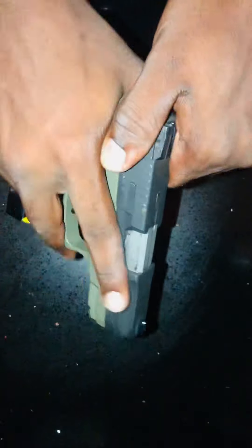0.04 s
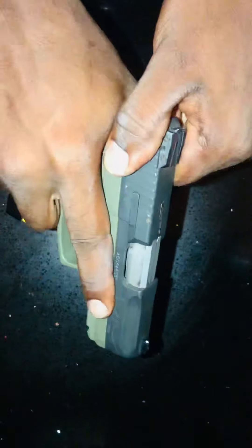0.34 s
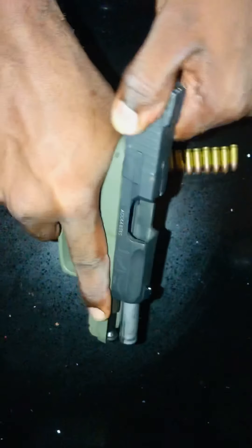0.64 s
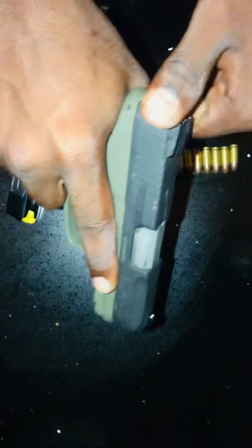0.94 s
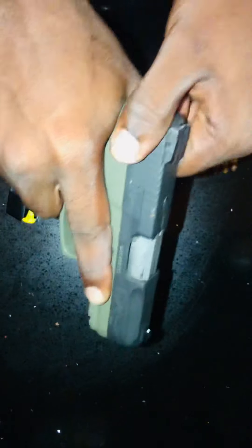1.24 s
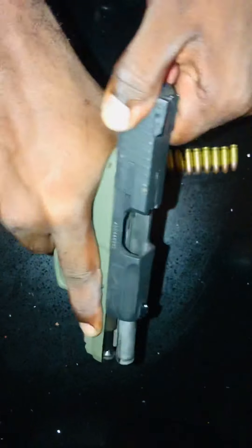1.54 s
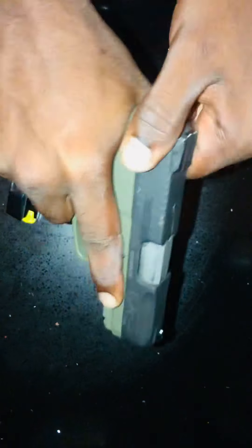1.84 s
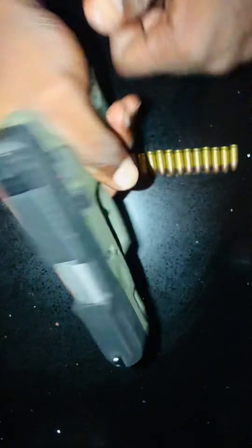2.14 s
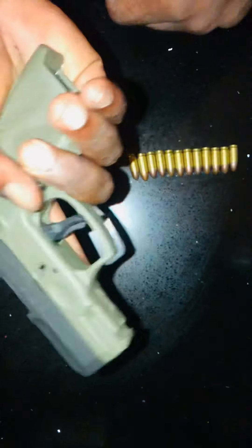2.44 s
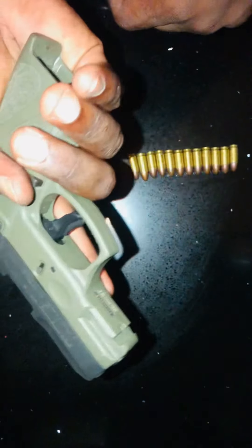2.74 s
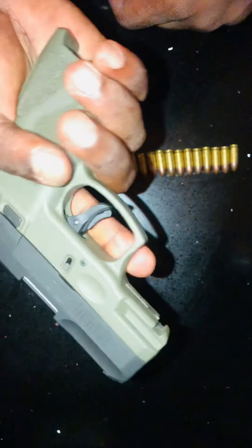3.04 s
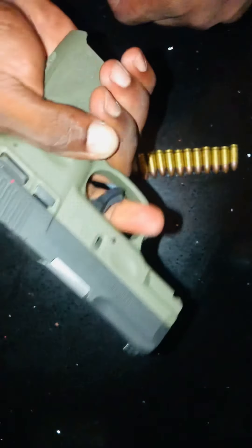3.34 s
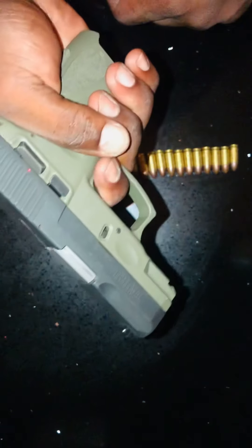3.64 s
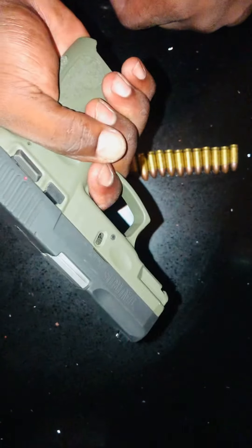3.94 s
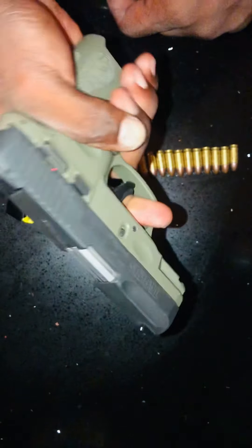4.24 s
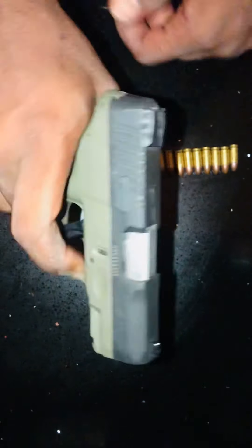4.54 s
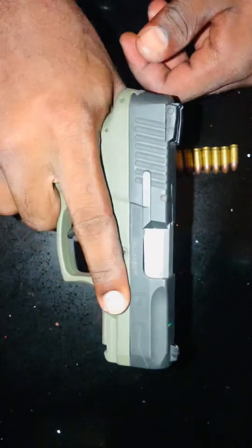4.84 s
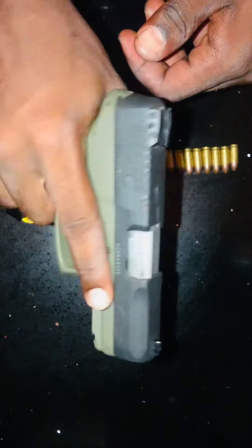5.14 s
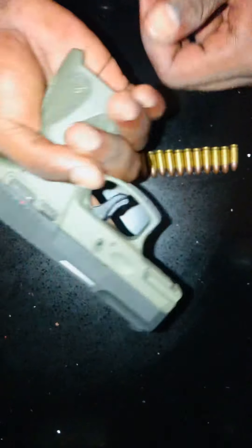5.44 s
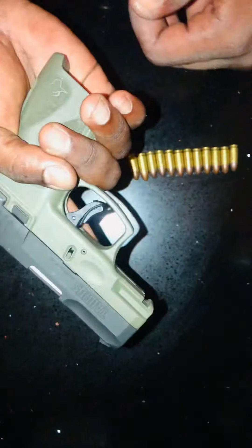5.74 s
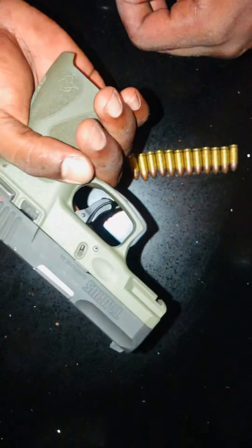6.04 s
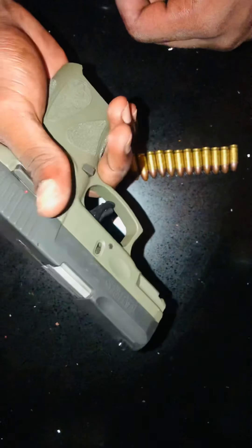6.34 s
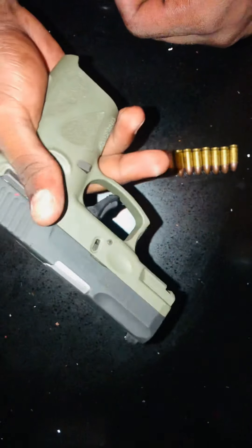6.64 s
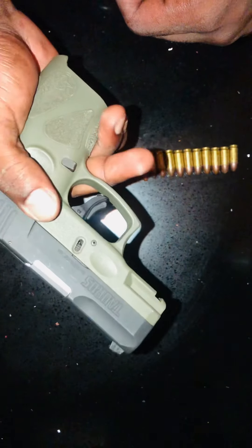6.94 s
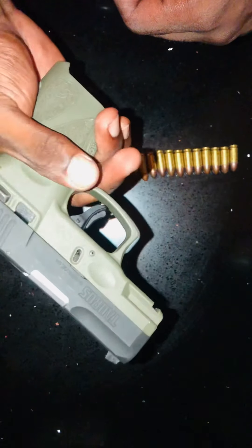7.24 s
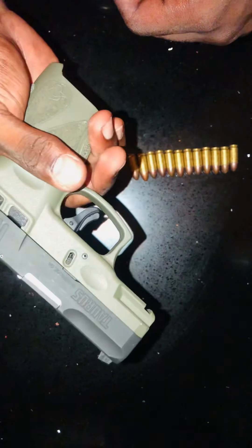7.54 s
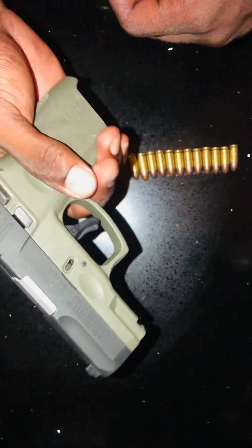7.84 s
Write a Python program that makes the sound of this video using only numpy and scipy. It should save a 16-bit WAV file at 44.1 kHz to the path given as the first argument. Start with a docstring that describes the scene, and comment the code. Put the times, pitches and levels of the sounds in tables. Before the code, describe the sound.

Close up and indoors, a handgun's metal slide is pulled back and released two times, making sharp, ringing clacks with short scrapes between them. A thin dry-fire click follows, then a bright snap with a little spring rattle and a second click right after it. The rest is quiet: soft ticks and rubs of fingers shifting on the grip, with faint electrical hum and slight room echo.

```python
"""Pistol racked and dry-fired

A pistol is racked twice over a counter in a small room: the slide unlocks, scrapes back, hits its stop
and slams home. The trigger snaps, a sprung part lets go with a rattle, the trigger snaps again and
fingers shift on the frame. Blows are noise bursts plus ringing modes; scrapes are streams of tiny slips.
Mains hum, a low rumble and a faint hopping electronic whine lie underneath."""
import sys
import numpy as np
from scipy import signal
from scipy.fft import rfft, irfft
from scipy.io import wavfile

SR = 44100
rng = np.random.default_rng(int(sys.argv[2]) if len(sys.argv) > 2 else 0)


def wrap_up_sound(samples):
    """Save the sound to the file named by the first command line argument, as 16-bit audio."""
    columns = np.atleast_2d(samples).T
    # keep every value between -1 and 1, then stretch to whole-number steps
    tamed = np.clip(columns, -1, 1)
    steps = np.round(tamed * 32767).astype(np.int16)
    wavfile.write(sys.argv[1], SR, steps)


N = 356328
RING_TIME_S = np.arange(SR // 2) / SR


def from_db(db):
    """Decibels to gain."""
    return 10 ** (np.asarray(db) / 20)


def at_hz(points, hz):
    """Read a table on a log-frequency axis."""
    table = np.array(points)
    return np.interp(np.log(hz + 1), np.log(table[:, 0]), table[:, 1])


def add(out, start_s, sound):
    """Mix a sound in at start_s."""
    start = max(int(start_s * SR), 0)
    out[start:start + len(sound)] += sound[:N - start]


def high_pass(x, edge_hz, order):
    """Butterworth high-pass."""
    return signal.sosfilt(signal.butter(order, edge_hz, "high", fs=SR, output="sos"), x + 1e-18)


def coloured(x, spectrum, tilt_db_oct=0):
    """Give x a spectrum, tilted above 1 kHz by the hardness of the contact; rms 1."""
    hz = np.fft.rfftfreq(len(x), 1 / SR)
    octaves = np.log2(np.maximum(hz, 1000) / 1000)
    shaped = irfft(rfft(x) * from_db(at_hz(spectrum, hz) + tilt_db_oct * octaves), len(x))
    return shaped / np.sqrt(np.mean(shaped ** 2) + 1e-20)


def decay(t, t60_s):
    """Exponential fall, 60 dB in t60_s."""
    return np.exp(-np.log(1000) * t / t60_s)


def drift(rate_hz):
    """Random wander of spread about 1."""
    return np.interp(np.arange(N) / SR * rate_hz, np.arange(2000), rng.standard_normal(2000))


def friction(curve, body, slips_per_s, spread_db, tilt_db_oct):
    """Sliding contact: tiny slips of uneven size, following a level curve of (s, dB) points."""
    times_s, db = np.transpose(curve)
    t = np.arange(times_s[0], times_s[-1], 1 / SR)
    slips = (rng.random(N) < slips_per_s / SR) * rng.choice([-1, 1], N)
    slips = slips * from_db(spread_db * rng.standard_normal(N))
    scrape = coloured(slips[:len(t)], body, tilt_db_oct)
    out = np.zeros(N)
    add(out, times_s[0], scrape * from_db(np.interp(t, times_s, db)))
    return out


def clatter(body, tilt_db_oct, t60_s, crack_db, crack_t60_s):
    """One contact: a bright crack over crowded, quickly dying modes."""
    crowd, crack = rng.standard_normal((2, len(RING_TIME_S)))
    onset = from_db(crack_db) * coloured(crack, body, tilt_db_oct + 2) * decay(RING_TIME_S, crack_t60_s)
    return onset + coloured(crowd, body, tilt_db_oct) * decay(RING_TIME_S, t60_s)


def ringing(modes, split_hz):
    """Clear modes of a part; loose joints split each into three beating partials, anew at every blow."""
    out = np.zeros(len(RING_TIME_S))
    for hz, db, t60_s in modes:
        t = RING_TIME_S[:int(t60_s * SR)]
        partials_hz = hz + split_hz * rng.standard_normal((3, 1))
        cluster = np.sin(2 * np.pi * (partials_hz * t + rng.random((3, 1)))).sum(axis=0) / np.sqrt(3)
        out[:len(t)] += from_db(db) * cluster * decay(t, t60_s)
    return out


def mains_hum(t, waver):
    """Hum lines, each wavering in level and phase."""
    # Each row: frequency in Hz, rms level in dB.
    lines = [(55.5, -68.5), (112, -64), (221.5, -67), (332.5, -73), (442, -76), (667.5, -85)]
    out = np.zeros(N)
    for hz, db in lines:
        amplitude = from_db(db) * np.sqrt(2) * (1 + waver * drift(12))
        out += amplitude * np.sin(2 * np.pi * hz * t + 2 * waver * drift(11))
    return out


def whine(t, hops_per_s, jitter_hz):
    """Thin electronic tone that hops in pitch, one pulse per hop."""
    # Pitches of one cycle.
    cycle_hz = [9100, 8426, 8474, 8820, 8750, 8815, 8700, 8700, 9000, 8750]
    hops = (t - .0867) * hops_per_s
    pitch_hz = np.array(cycle_hz)[np.floor(hops).astype(int) % len(cycle_hz)] + jitter_hz * drift(200)
    return np.abs(np.sin(np.pi * hops)) * np.sin(2 * np.pi * np.cumsum(pitch_hz) / SR)


def background():
    """Room rumble and hiss, hum and whine; all sink midway and recover."""
    # Noise floor. Each row: frequency in Hz, relative density in dB.
    spectrum = [(25, -30), (40, -21), (55, -6), (80, -9.5), (120, -7.5), (160, -8.5), (280, -16),
                (450, -15.5), (700, -23.5), (1200, -29), (2500, -37), (4500, -39.5), (8000, -43.5),
                (16000, -46.5)]
    # Each row: time in seconds, background gain in dB.
    level_curve = [(0, 0), (3.8, 1.5), (3.95, -3.5), (5.5, -1.5), (7, 0), (8.08, 0.5)]
    t = np.arange(N) / SR
    noise = high_pass(from_db(-62) * coloured(rng.standard_normal(N), spectrum), edge_hz=42, order=4)
    hum = mains_hum(t, waver=.39)
    tone = from_db(-78.5) * whine(t, hops_per_s=30, jitter_hz=130)
    return (noise + hum + tone) * from_db(np.interp(t, *np.transpose(level_curve)))


def room_echo(build_s):
    """Diffuse reflections that build up briefly and die sooner in the treble; unit energy."""
    # Each row: frequency in Hz, reverberation t60 in seconds.
    decay_times = [(200, 1.1), (1500, 0.45), (4500, .5), (9000, 0.43), (16000, 0.4)]
    # Each row: frequency in Hz, relative echo level in dB.
    colour = [(200, 0), (1500, 0.5), (4500, -1.5), (9000, -4.5), (16000, -0.5)]
    t = np.arange(SR * 3 // 4) / SR
    edges_hz = np.geomspace(150, 18000, 13)
    echo = np.zeros(len(t))
    for low_hz, high_hz in zip(edges_hz, edges_hz[1:]):
        band_pass = signal.butter(2, [low_hz, high_hz], "band", fs=SR, output="sos")
        band = signal.sosfilt(band_pass, rng.standard_normal(len(t)))
        hz = np.sqrt(low_hz * high_hz)
        echo += band * from_db(at_hz(colour, hz)) * decay(t, at_hz(decay_times, hz))
    echo *= 1 - np.exp(-t / build_s)
    return echo / np.sqrt(np.sum(echo ** 2))


def swell(start_s, length_s, db):
    """Level curve of a stroke that grows and fades."""
    return [(start_s, db - 11.5), (start_s + length_s / 3, db),
            (start_s + 2 * length_s / 3, db - 5.5), (start_s + length_s, db - 13.5)]


def squeak(start_s, length_s, hz, db):
    """Sticking surfaces: rapid slips excite one resonance."""
    resonance = [(hz / 2, -28), (hz * .87, -11), (hz, 0), (hz * 1.15, -11), (hz * 2, -28)]
    curve = swell(start_s, length_s, db)
    return friction(curve, resonance, slips_per_s=2500, spread_db=1.5, tilt_db_oct=1)


def handling():
    """Fingers tap, rub and squeak on the plastic frame."""
    # Frame vibration. Each row: frequency in Hz, relative density in dB.
    body = [(200, -23.5), (800, -18.5), (1400, 2), (2500, -2), (3500, -2.5), (5000, -2), (7500, -8),
            (11000, -10.5), (16000, -9.5)]
    # Fingers and loose parts. Each row: start in seconds, level in dB, tilt in dB/octave, pitch in Hz.
    ticks = [(.2615, -44, -15, 1510), (.3684, -47.5, -10, 2500), (1.095, -52.5, -1.5, 1476),
             (2.2307, -38.5, -4, 1600), (2.364, -48.5, -6, 1350), (2.4438, -45.5, -5, 1727),
             (3.5426, -29.5, 0, 2460), (3.5875, -36, -4, 1510), (3.6738, -38, -0.5, 4970),
             (3.7515, -42, -4.5, 2490), (4.4326, -40, -2.5, 4380), (4.5626, -45, -4, 4780),
             (5.5386, -56.5, -1.5, 2618), (6.1977, -54, -3.5, 1900), (6.2442, -53, -5, 1488),
             (6.7209, -46, -12.5, 1550), (7.1489, -40.5, -9.5, 1510), (8.051, -52.5, -15, 1458)]
    # Skin on the grip. Each row: start and length in seconds, level in dB, tilt in dB/octave.
    rubs = [(0, 0.16, -61, 1), (0.183, 0.21, -60, -0.5), (2.907, 0.035, -64.5, -1.5),
            (2.992, 0.044, -62, 0.5), (3.086, 0.23, -58.5, 0), (3.538, 0.062, -49.5, -1),
            (3.978, 0.19, -48.5, 1.5), (5.323, 0.035, -63, -1.5), (6.494, 0.18, -66.5, -5.5),
            (7.137, 0.089, -54, 3)]
    # Each row: start and length in seconds, pitch in Hz, level in dB.
    squeaks = [(0.474, 0.02, 9400, -27), (0.711, 0.042, 2880, -35), (1.68, 0.049, 1600, -39.5),
               (3.547, 0.034, 2500, -52.5), (3.813, 0.014, 3030, -44), (6.504, 0.027, 2590, -56.5),
               (6.568, 0.059, 2650, -62.5)]
    out = np.zeros(N)
    for start_s, db, tilt, hz in ticks:
        knock = from_db(-3.5) * clatter(body, tilt + 2.2, t60_s=.033, crack_db=-1, crack_t60_s=.0087)
        ring = ringing([(hz, -6.5, .016)], split_hz=110)
        add(out, start_s, from_db(db) * (knock + ring))
    for start_s, length_s, db, tilt in rubs:
        curve = swell(start_s, length_s, db)
        out += friction(curve, body, slips_per_s=3200, spread_db=3.5, tilt_db_oct=tilt)
    out += sum(squeak(*row) for row in squeaks)
    return high_pass(out, edge_hz=690, order=4)


def spring():
    """A sprung part lets go with a bright snap; the coils rattle out against their channel."""
    # Spring vibration. Each row: frequency in Hz, relative density in dB.
    body = [(200, -45.5), (700, -16), (1300, -5), (2000, -6.5), (3000, 0.5), (4500, -2), (6500, -1.5),
            (9500, 2.5), (11000, 12), (13000, 1), (16000, 1)]
    # Each row: frequency in Hz, relative level in dB, t60 in seconds.
    modes = [(3149, -16, .1), (7850, -22, .15), (9110, -20, .15), (10950, -11, .16), (11320, -15, .25),
             (12000, -20, .2), (15600, -18, .14)]
    # Each row: start in seconds, level in dB, tilt in dB/octave, t60 in seconds.
    hits = [(3.8018, -35.5, 3.5, 0.029), (3.822, -16.5, -0.5, 0.037), (3.8242, -9.5, 2.5, 0.02),
            (3.832, -14.5, 11, 0.014)]
    rattle_s, peak_s, end_s = 3.823, 3.854, 3.994
    rattle_curve = [(rattle_s, -35.5), (peak_s, -27), (end_s, -60)]
    out = friction(rattle_curve, body, slips_per_s=4100, spread_db=2, tilt_db_oct=-1.5)
    for start_s, db, tilt, t60_s in hits:
        snap = from_db(-5) * clatter(body, tilt - 2.5, t60_s, crack_db=7.5, crack_t60_s=.0058)
        ring = from_db(-10) * ringing(modes, split_hz=87.4)
        add(out, start_s, from_db(db) * (snap + ring))
    return high_pass(out, edge_hz=1030, order=2)


def trigger():
    """Thin, dry snaps inside the frame; a firm grip lowers and damps the ring."""
    # Trigger vibration. Each row: frequency in Hz, relative density in dB.
    body = [(200, -37), (900, -44), (1300, 8), (2000, 10), (3000, 4), (4300, 12.5), (5500, 3.5),
            (7300, -0.5), (9000, -3), (11000, -4.5), (16000, -10.5)]
    # Each row: frequency in Hz, relative level in dB, t60 in seconds.
    modes = [(1360, -15, .04), (3330, -16, .02), (4220, -11, .02), (4620, -12.5, .02), (6170, -17, .03),
             (8890, -17, .025)]
    # Each row: start in seconds, level in dB, tilt in dB/octave, ring in dB, ring pitch ratio,
    # grip damping in dB/octave.
    snaps = [(3.1681, -10, 5, -1.5, .99, 1.5), (4.0368, -35, 0, 6, .94, 7),
             (4.0658, -14.5, 8, -1.5, .93, 5.5)]
    # The striker lands and rebounds twice. Each row: delay in seconds, level in dB, t60 in seconds.
    striker = [(0, 0.5, 0.03), (.0027, -5, 0.015), (.007, -12.5, .04)]
    out, lowest_hz = np.zeros(N), modes[0][0]
    for start_s, db, tilt, ring_db, pitch_ratio, damping_db_oct in snaps:
        gripped = [(hz * pitch_ratio, mode_db - damping_db_oct * np.log2(hz / lowest_hz), mode_t60_s)
                   for hz, mode_db, mode_t60_s in modes]
        for delay_s, blow_db, t60_s in striker:
            snap = from_db(-3.5) * clatter(body, tilt, t60_s, crack_db=-7.5, crack_t60_s=.0047)
            ring = from_db(ring_db) * ringing(gripped, split_hz=50)
            add(out, start_s + delay_s, from_db(db + blow_db) * (snap + ring))
    return high_pass(out, edge_hz=970, order=5)


def travel(start_s, end_s, end_db, start_db, overrun_s, release_s):
    """Level curve of one run on the rails: friction grows with the slide's speed, then dies away."""
    rest_s = end_s + overrun_s
    return [(start_s - .036, -72), (start_s, start_db),
            (rest_s, end_db), (rest_s + release_s, end_db - 27)]


def rack_contacts(unlock_s, stop_s, stop_db, stop_tilt, forward_s, barrel_s, home_s, settle_s):
    """Timed blows of one rack: opening, chatter against the rear stop, closing."""
    # Each contact: level in dB, tilt in dB/octave, t60 in seconds, ring in dB.
    take_up = (-31.5, -4, 0.19, -7)
    unlock = (-12.5, 1, 0.0351, -5)
    barrel_drop = (-11, 1.5, 0.0569, -2)
    set_off = (-24, 2.5, 0.0341, -5)
    meet_barrel = (-12.5, 2.5, .055, 2)  # the steel rings more once the hand lets go
    lock_home = (-5, 3.2, .022, -1)
    settle = (-12, 1.5, 0.0387, -3)
    bounce_s, loss_db, t60_s, ring_db = .0045, 5.5, .045, -1.5
    opening = [(unlock_s - .011, *take_up), (unlock_s, *unlock), (unlock_s + .0137, *barrel_drop)]
    chatter = [(stop_s + k * bounce_s, stop_db - k * loss_db, stop_tilt, t60_s, ring_db)
               for k in range(3)]
    closing = [(forward_s, *set_off), (barrel_s, *meet_barrel),
               (home_s, *lock_home), (settle_s, *settle)]
    return opening + chatter + closing


def slide():
    """The steel slide scrapes and catches along its rails and clacks at both ends of its travel."""
    # Slide vibration. Each row: frequency in Hz, relative density in dB.
    body = [(200, -21.5), (400, -18.5), (700, -16.5), (1000, -12), (1350, 2), (2000, -2), (4000, 2),
            (5500, -0.5), (7800, -8.5), (9200, 1), (10800, -8.5), (16000, -8.5)]
    # Each row: frequency in Hz, relative level in dB, t60 in seconds.
    modes = [(1500, -16, .1), (1690, -15, .12), (2210, -10, .09), (2685, -7, .06), (2995, -7, .06),
             (3820, -12, .1), (4198, -14, .1), (4625, -21, .33), (4993, -15, .09), (5205, -13, .08),
             (6154, -17, .1), (6555, -15.5, .24), (8800, -14, .25), (8975, -10, .25), (9120, -12, .33),
             (9333, -7, .23), (9600, -13, .18), (9880, -14, .1), (10955, -18, .12), (12100, -19, .13),
             (15005, -17, .12)]
    # Each row: unlock and rear stop in seconds, stop level in dB, stop tilt in dB/octave,
    # then forward start, barrel contact, lock-up and settling in seconds.
    racks = [(0.4068, .526, -8, 1.5, .7113, .7637, .7728, .7925),
             (1.3743, 1.4727, -5.5, 4, 1.7002, 1.7651, 1.7788, 1.7832)]
    # Each row: start in seconds, level in dB, tilt in dB/octave.
    catches = [(0.4457, -26.5, 0), (0.484, -17, 1), (0.5075, -20, -.5), (0.5612, -24.5, -.5),
               (.64, -37, -2), (.693, -44, -6.5), (0.7451, -25.5, 0), (.785, -16, 2), (1.4249, -20.5, 1.5),
               (1.431, -21, 3), (1.455, -18, 1), (1.677, -41, -2.5), (1.7296, -29.5, -2.5),
               (1.7429, -25, 2.5), (1.8429, -31.5, -3.5)]
    # Rail friction, back and forward. Each: starting level in dB, overrun and release in seconds.
    pull = (-41, .025, .07)
    forward = (-38, .017, .035)
    catch_t60_s, catch_ring_db, forward_end_db = .042, -4, -32
    hits = [(*catch, catch_t60_s, catch_ring_db) for catch in catches]
    runs = []
    for rack in racks:
        unlock_s, stop_s, stop_db, _, forward_s, _, home_s, _ = rack
        pull_end_db = stop_db - 27  # a faster pull scrapes louder and hits the stop harder
        runs.append(travel(unlock_s, stop_s, pull_end_db, *pull))
        runs.append(travel(forward_s, home_s, forward_end_db, *forward))
        hits += rack_contacts(*rack)
    out = sum(friction(run, body, slips_per_s=4000, spread_db=2.5, tilt_db_oct=-1.7) for run in runs)
    for start_s, db, tilt, t60_s, ring_db in hits:
        clack = from_db(-2.5) * clatter(body, tilt - .3, t60_s, crack_db=-1, crack_t60_s=.021)
        ring = from_db(ring_db - 13) * ringing(modes, split_hz=50)
        add(out, start_s, from_db(db) * (clack + ring))
    return high_pass(out, edge_hz=220, order=2)


def scene():
    """The pistol close by, the room answering each part; mono."""
    racking, snaps, rattle, fingers = slide(), trigger(), spring(), handling()
    send = from_db(-18) * racking + from_db(-19) * snaps + from_db(-13.5) * (rattle + fingers)
    room = signal.fftconvolve(send, room_echo(build_s=.0039))[:N]
    return (racking + snaps + rattle + fingers + room + background())[None]


def record(dry):
    """Soft-clip the peaks, then cut the top treble."""
    ceiling, cutoff_hz = .95, 15780
    low_pass = signal.ellip(10, .2, 70, cutoff_hz, fs=SR, output="sos")
    return signal.sosfilt(low_pass, ceiling * np.tanh(dry / ceiling))


dry = scene()
out = record(dry)
wrap_up_sound(out)
```